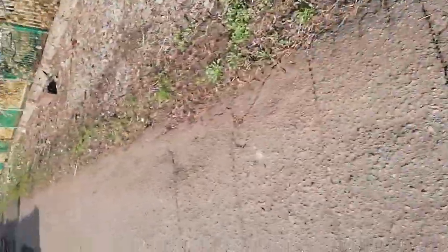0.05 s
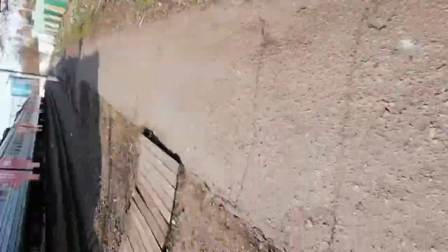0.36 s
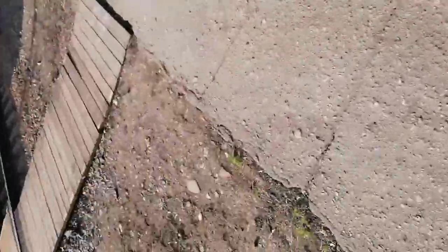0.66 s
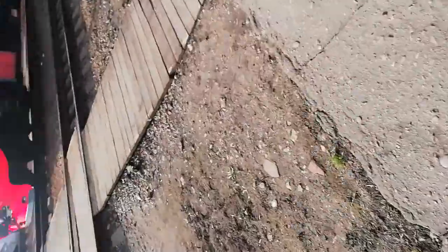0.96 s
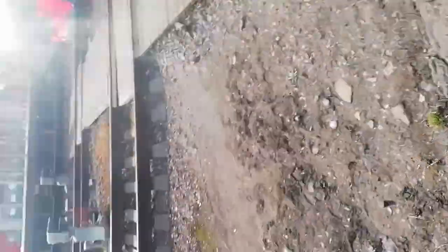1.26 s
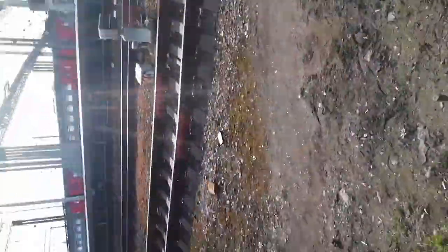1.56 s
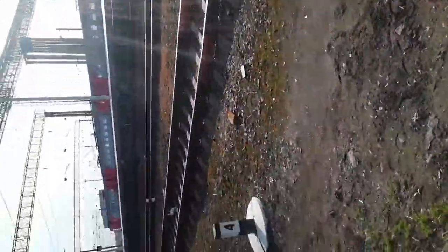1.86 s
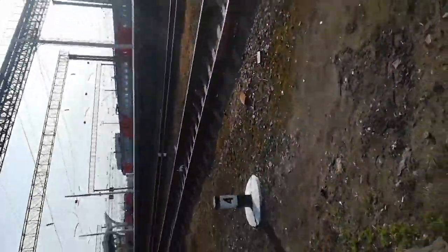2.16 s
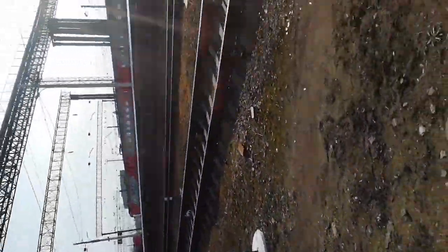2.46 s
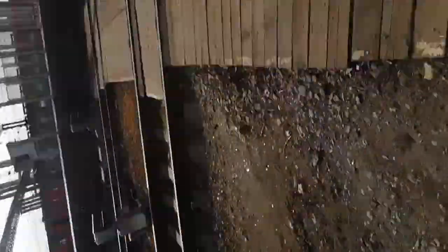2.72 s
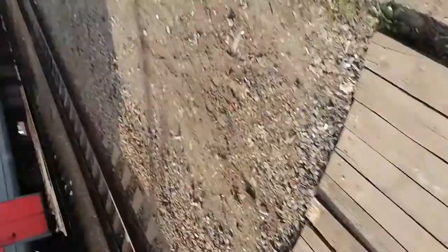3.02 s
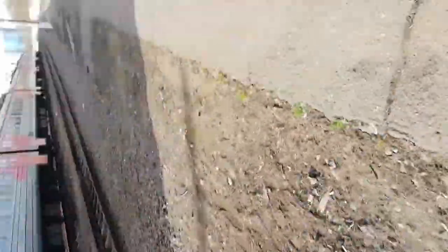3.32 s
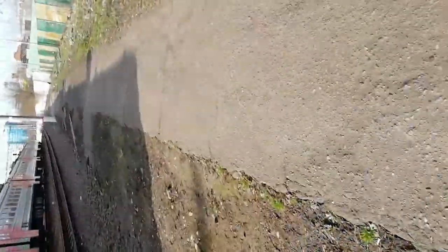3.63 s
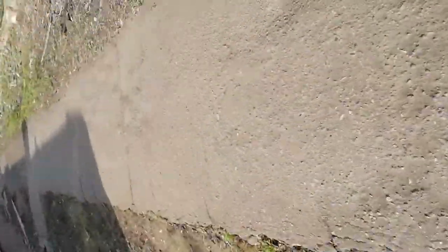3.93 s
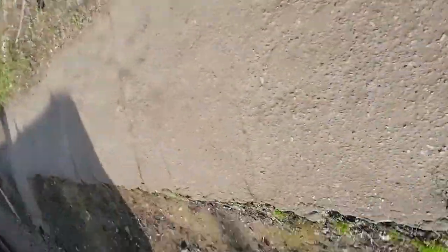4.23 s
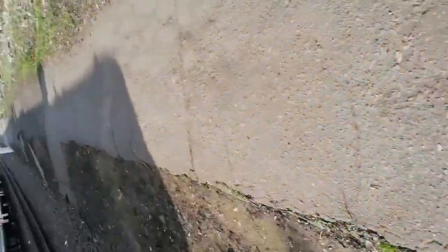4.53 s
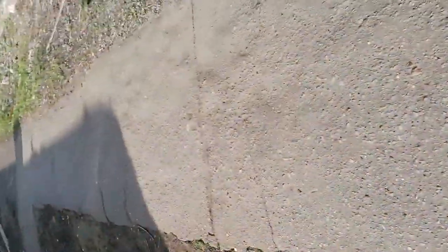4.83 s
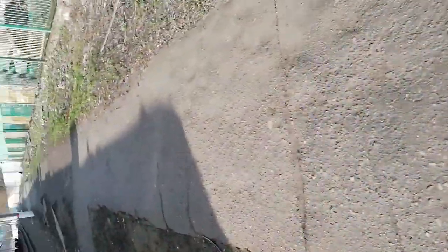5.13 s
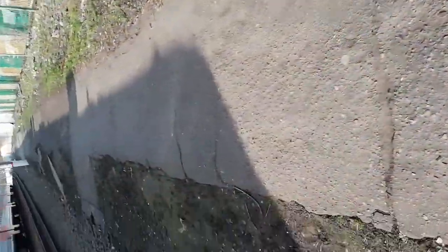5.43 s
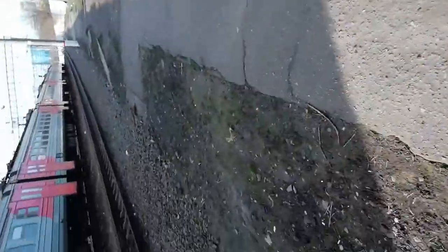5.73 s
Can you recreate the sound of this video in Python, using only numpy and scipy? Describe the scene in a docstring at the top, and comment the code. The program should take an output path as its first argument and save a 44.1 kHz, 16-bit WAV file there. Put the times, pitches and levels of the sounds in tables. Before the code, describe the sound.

A parked electric train hums and rumbles steadily under a roar and hiss of cooling air, growing slightly louder.

```python
"""An electric train stands in an open rail yard, its auxiliaries running, heard from a carried phone.
From the start a blower throbs and hums, a second motor drones and the car body rumbles, while turbulent
cooling air roars and hisses, its colour and stereo image swinging as the phone turns. From 1.5 s the
phone faces away and the treble is shaded; faint chirps follow, then sleeve-like swishes around 3 s.
As the phone draws nearer the body booms more strongly, and after 4 s one panel rings in swells."""
import sys
import numpy as np
from scipy import signal
from scipy.fft import rfft, irfft, next_fast_len
from scipy.io import wavfile

SR = 44100
rng = np.random.default_rng(int(sys.argv[2]) if len(sys.argv) > 2 else 0)


def put_to_file(sound):
    """Save the sound as 16-bit audio at rate SR, in the file named by the first command-line argument."""
    columns = np.atleast_2d(sound).T  # one column per channel
    safe = np.clip(columns, -1, 1)
    whole_steps = np.round(safe * 32767)
    wavfile.write(sys.argv[1], SR, whole_steps.astype(np.int16))


N = 263718
FRAME, HOP = 1024, 256
TIME = np.arange(N) / SR
FRAME_S = np.arange(N // HOP + 2) * HOP / SR
BIN_HZ = np.maximum(np.arange(FRAME // 2 + 1) * SR / FRAME, 1)[:, None]

# The walk towards the train: time_s, nearness (0 to 1)
NEARNESS = [(0, 0.04), (2.55, 0.44), (3.1, 0.61), (5.98, 1)]
# Direction of the train from the phone: time_s, side (0 ahead, 1 side-on)
BEARING = [(0, 0.34), (.65, 0.76), (1.2, 0.69), (1.6, 0.36), (2.45, 0.095), (2.9, 0.91), (3.3, 0.55),
           (4, 0.093), (4.6, 0.08), (5.4, 0), (5.98, 0.42)]
# Shading of the left, then the right microphone port: start_s, end_s, fade_in_s, fade_out_s
FACING_AWAY = [(1.5, 2.75, 0.16, 0.17), (1.51, 2.95, 0.14, 0.072)]
# Surges of the air noise as the phone swings: time_s, half_length_s, gain_db
SURGES = [(.68, 0.21, -3.5), (3.0, 0.062, 2), (3.28, 0.14, 4), (5.15, .18, 1.5), (5.7, 0.24, 1)]

# Diffuse wash of the yard, left port then right: far_db, near_gain_db, side_gain_db, away_gain_db,
# surge_share. The other air sounds' LEVELS have the same columns and precede the port response.
WASH_LEVELS = [(-55, 10.5, 2.5, 1.5, -0.1), (-49.5, 7.5, -1.5, 3.5, -0.4)]
# Spectrum of the wash: frequency_hz, gain_db
WASH_SPECTRUM = [(60, -53), (180, -8), (330, -1), (430, -1.5), (540, -6), (740, 1.5), (1400, -4),
                 (2500, -12.5), (4000, -13.5), (8000, -27.5)]
# Far chirps, as of a small bird: time_s, half_length_s, pitch_hz, glide_octaves_per_s, left_db, right_db
CHIRPS = [(2.27, .03, 4640, -4, -66, -53), (2.309, 0.01, 3880, 2, -62, -51),
          (2.722, 0.039, 4760, -4, -56, -51), (2.822, 0.017, 4750, -1.5, -54, -60)]
# Swishes, as of a sleeve: time_s, rise_s, fall_s, left_db, right_db
SWISHES = [(2.86, .1, 0.078, -61, -58), (2.927, 0.026, 0.043, -43, -40), (2.985, 0.014, 0.06, -47, -44),
           (3.29, 0.19, 0.039, -54, -44), (3.98, .01, .03, -59, -57)]
# Spectrum of the swishes: frequency_hz, gain_db
SWISH_SPECTRUM = [(200, -2), (450, 9), (1500, 1), (3300, 5), (5500, 8.5), (7700, -5), (10000, 0.5),
                  (14500, 2), (15800, -10)]

# Spectrum of the car body's rumble: frequency_hz, gain_db
RUMBLE_SPECTRUM = [(15, -23), (30, -42), (43, 5.5), (80, 5), (135, 4), (170, -2), (220, -2.5), (280, -4),
                   (340, -14), (450, -20.5), (650, -86), (1200, -75)]
# Resonances of the car body: centre_hz, width_hz, gain_db
BODY_MODES = [(162.5, 32, 0), (182.3, 16, -2), (200.4, 20, -1), (226.7, 38, -4.5), (273.7, 22, -9)]
# Boom of those resonances: time_s, level_db
BOOM_ENVELOPE = [(0, -49.5), (.85, -42), (1.9, -47.5), (2.5, -47.5), (2.75, -41), (3.55, -41.5),
                 (3.7, -35.5), (3.88, -39), (4.05, -38.5), (4.38, -42.5), (4.72, -38.5), (5.2, -41.5),
                 (5.6, -40), (5.98, -37)]
# Ringing of one panel: time_s, level_db
PANEL_ENVELOPE = [(0, -57.5), (2.7, -53), (4.1, -54), (4.28, -42), (4.4, -51), (4.6, -36), (4.82, -44),
                  (5.0, -42), (5.12, -35.5), (5.26, -49), (5.55, -37.5), (5.7, -47.5), (5.87, -30.5),
                  (5.98, -43)]
# Drone of the second motor: time_s, level_db
MOTOR_ENVELOPE = [(0, -43), (.4, -60), (1.1, -42.5), (2.7, -44), (3.8, -45.5), (4.3, -51.5), (5.98, -46)]
# Blade tone of the blower: time_s, level_db
BLADE_ENVELOPE = [(0, -55), (.9, -48), (1.8, -57), (2.28, -45), (2.52, -62), (2.88, -46.5), (3.2, -55),
                  (3.4, -45.5), (4.5, -43.5), (5.15, -43), (5.48, -36.5), (5.68, -46.5), (5.98, -36.5)]
# Weak harmonics of the blower shaft: shaft_multiple, level_re_blade_tone_db
SHAFT_HARMONICS = [(4, -13), (5, -10), (9, -17), (11, -14.5), (12, -22.5), (21, -22), (23, -21.5),
                   (25, -21), (28, -16)]

# Spacing of the dips that a close reflection makes at the left port: time_s, spacing_hz
COMB_SPACING = [(0, 1690), (.33, 1530), (.45, 1570), (.85, 1270), (1.0, 1470), (1.3, 1530), (1.5, 1660),
                (1.62, 1560), (1.85, 1720), (2.45, 1760), (2.7, 1510), (2.92, 1250), (3.07, 1430),
                (3.27, 1620), (3.9, 1680), (4.2, 1800), (5.4, 1780), (5.98, 1590)]
# A dip at the right port that slides as the phone tilts: time_s, centre_hz
SLIDING_DIP = [(0, 1030), (.36, 830), (.62, 1420), (.85, 1370), (1.25, 1170), (1.47, 1040), (1.6, 690),
               (2.58, 550), (2.78, 1220), (3.05, 866), (3.55, 843), (3.95, 1110), (4.65, 1010),
               (5.15, 1115), (5.65, 1004), (5.98, 1190)]
# Gliding crests and troughs: time_s, half_length_s, centre_hz, glide_octaves_per_s, left_db, right_db
SWEEPS = [(0.286, .15, 3200, -1, 5, 4.5), (.25, 0.27, 3900, -0.5, -0.5, -8.5),
          (0.44, 0.058, 5400, 1.5, 3, 4), (.41, 0.083, 2630, 4, -2, -6), (.55, 0.065, 2770, 2.1, 1, 3.5),
          (.6, 0.1, 5300, -1, 4, -5), (0.726, 0.11, 3260, -0.5, -1, 7), (.8, 0.33, 4750, -4, -0.5, -1),
          (0.906, .09, 2680, -0.5, 0, 5.5), (0.928, 0.11, 3780, 1, 1, -4), (1.08, 0.044, 5200, 0, 2, -6),
          (1.35, .15, 5300, -0.5, 1, -8), (1.45, 0.22, 3780, 0.5, -4, -7),
          (1.52, 0.17, 1280, 0.16, 8.5, -4), (2.1, .3, 2800, 2.5, -2, 2), (2.975, 0.052, 3170, -2, 4, 6),
          (3.022, .1, 4560, 4, 3, -2), (3.123, 0.045, 5100, 3, 1, 6.5), (3.112, 0.047, 4270, 3, 4, -8),
          (3.25, 0.11, 3640, -0.5, 0, -5), (3.297, .08, 6940, 3.5, -5, 8.5), (3.35, .35, 2190, -0.55, 0, 6),
          (3.5, 0.31, 4150, .3, 0, -4), (4.506, 0.2, 1980, -0.62, 3, 9.5), (4.47, .14, 3200, -.6, 1, -3),
          (5.204, 0.17, 3550, 1, 3, 4.5), (5.69, .09, 3300, 1, 8, -3), (5.6, 0.46, 11500, 0.5, 1, 1),
          (5.9, .1, 5140, .5, 0, 1)]

# Hollow resonance of the air: far_db, near_gain_db, side_gain_db, away_gain_db, surge_share
HOLLOW_LEVELS = [(-62, 10, -6, 1.7, 0.3), (-56.5, -8, 13.5, 1.3, 0.89)]
# Its centre at the right port: time_s, centre_hz
HOLLOW_RIGHT_CENTRE = [(0, 3220), (.5, 3100), (.72, 3180), (1.2, 2830), (1.7, 2530), (2.6, 2400),
                       (2.95, 2950), (3.25, 2810), (3.8, 2430), (5.3, 2450), (5.98, 3230)]
# Its swells at the right port: time_s, half_length_s, gain_db
HOLLOW_SWELLS = [(0, 0.16, -19), (.3, 0.11, 6.5), (.74, 0.091, 1), (1.3, 0.23, -1), (3.22, 0.25, 9.5),
                 (4.5, 0.74, -15), (5.68, .12, -14)]

# Hiss of the vents: far_db, near_gain_db, side_gain_db, away_gain_db, surge_share
HISS_LEVELS = [(-52.5, 1.8, 7.6, -5, 0.45), (-41.5, 1.3, 1.7, -14, 0.55)]
# Spectrum underlying the hiss: frequency_hz, gain_db
HISS_SPECTRUM = [(3000, -3), (4000, 1), (4500, 1.5), (4950, 3), (5500, 1.5), (6200, 2.5), (7000, -5.5),
                 (7700, -29), (10000, -36)]
# Peak of the hiss at the right port: time_s, centre_hz
HISS_RIGHT_PEAK = [(0, 4630), (.4, 4770), (.7, 5450), (1.3, 5050), (2.2, 4900), (2.95, 4640), (3.12, 4900),
                   (3.25, 4800), (3.65, 4970), (4.3, 4540), (5.1, 4720), (5.6, 4370), (5.83, 4900),
                   (5.98, 4950)]
# Rise and fall of the hiss at the right port: time_s, gain_db
HISS_RIGHT_GAIN = [(0, -.5), (.43, -0.5), (.6, -3.5), (1.1, -8), (1.45, -0.5), (1.9, 3), (2.5, 2.5),
                   (2.8, 0), (3.0, 0), (3.3, -1), (3.7, -1), (4.6, -0.1), (5.98, -2.5)]
# Thin whistles in the vents: pitch_hz, width_hz, level_re_peak_db
WHISTLES = [(4500, 90, 3), (4850, 150, -5.5)]
# Fine sizzle above the hiss: far_db, near_gain_db, side_gain_db, away_gain_db, surge_share
SIZZLE_LEVELS = [(-55, 4.2, 3.7, -7, 1), (-58, 5.2, 0.22, -13, 1.0)]
# Spectrum of the sizzle: frequency_hz, gain_db
SIZZLE_SPECTRUM = [(5000, 1), (7600, -1), (8600, 1.5), (9300, 1.5), (9900, 6), (10700, 2), (11500, 4.5),
                   (13500, 1), (15000, 4), (15800, -10)]

# Air rushing through the grilles: far_db, near_gain_db, side_gain_db, away_gain_db, surge_share
RUSH_LEVELS = [(-46, 0.38, 2.8, -5, 0.21), (-37, -1.8, 0.78, -7.5, 0.086)]
# Spectrum underlying the rush: frequency_hz, gain_db
RUSH_SPECTRUM = [(700, -16), (1250, 11), (1500, 7.5), (2200, 4.5), (3100, 2), (3800, -2.5), (5000, -46),
                 (8000, -22)]
# Its crests at the right port, in multiples of the sliding dip: centre_ratio, width_ratio, gain_db
RUSH_CRESTS = [(1.73, 0.75, 1), (3.3, 0.75, -2.5)]
# Its swells at the right port: time_s, half_length_s, gain_db
RUSH_SWELLS = [(.51, 0.078, 3.5), (.83, 0.2, 1.5), (4.48, 0.2, -2.5), (5.68, 0.25, 2)]

# Roar of the fan: far_db, near_gain_db, side_gain_db, away_gain_db, surge_share
ROAR_LEVELS = [(-39.5, 3.7, 0.9, -1.9, 0.017), (-37, 2.5, -1.8, -0.027, 0.98)]
# Its swells at the right port: time_s, half_length_s, gain_db
ROAR_SWELLS = [(.15, 0.25, -7), (.76, 0.089, 7.5), (1.2, 0.18, -4), (1.76, 0.16, 4), (2.6, 0.061, 1.5),
               (3.15, 0.12, 5.5), (3.55, 0.12, 4)]


def from_db(db):
    """Amplitude grows tenfold for every 20 dB."""
    return 10 ** (np.asarray(db) / 20)


def curve(rows, at=TIME):
    """Linear interpolation of a (time_s, value) table."""
    return np.interp(at, *np.transpose(rows))


def bell(at, centre_s, half_length_s):
    """A Gaussian envelope, 1 at its centre."""
    return np.exp(-((at - centre_s) / half_length_s) ** 2)


def swells(rows):
    """Gaussian rises and falls add in dB, frame by frame."""
    return sum(db * bell(FRAME_S, s, length) for s, length, db in rows)


def spectrum(points, hz):
    """Spectral envelope: gain interpolated on log axes, falling 12 dB an octave past the last point."""
    knots, db = np.transpose(points)
    return from_db(np.interp(np.log(hz), np.log(knots), db)) * np.minimum(1, knots[-1] / hz) ** 2


def resonance(centre_hz, width_hz, hz=BIN_HZ):
    """Gain of a second-order resonance applied twice, 1 at its centre."""
    return 1 / (1 + ((hz ** 2 - centre_hz ** 2) / (hz * width_hz)) ** 2)


def noise(shape):
    """Spectral shaping of white noise by the gain shape(hz), scaled to rms 1."""
    size = next_fast_len(N, real=True)
    hz = np.maximum(np.arange(size // 2 + 1) * SR / size, 1e-3)
    shaped = irfft(rfft(rng.standard_normal(size)) * shape(hz), size)[:N]
    return shaped / np.sqrt(np.mean(shaped ** 2) + 1e-20)


def drift(rate_hz):
    """Random modulation: low-pass noise of rms 1."""
    return noise(lambda hz: 1 / (1 + (hz / rate_hz) ** 2) ** 2)


def tone(hz, wander_rad, flutter_db):
    """Multipath fading: changing echo paths shake the phase and level of a sinusoid of rms about 1."""
    phase = 2 * np.pi * (hz * TIME + rng.random()) + wander_rad * drift(3.2)
    return np.sqrt(2) * np.sin(phase) * from_db(flutter_db * drift(24))


def port_levels(rows):
    """Distance, bearing and acoustic shadow set an air sound's left and right level in dB."""
    near, side = curve(NEARNESS, FRAME_S), curve(BEARING, FRAME_S)
    return [db + near_db * near + side_db * side + away_db * shade + share * swells(SURGES)
            for (db, near_db, side_db, away_db, share), shade in zip(rows, shadows())]


def shadows():
    """Acoustic shadow on each port (0 to 1) while the phone faces away."""
    return [0.5 * (np.tanh((FRAME_S - start) / fade_in) - np.tanh((FRAME_S - end) / fade_out))
            for start, end, fade_in, fade_out in FACING_AWAY]


def airflow(shapes, levels, response, coherence, gust_db, right_gain_db=0):
    """Partial coherence: each port hears turbulent noise shared with the other, and noise of its own."""
    white = rng.standard_normal((3, (len(FRAME_S) - 1) * HOP))
    shared, *separate = signal.stft(white, nperseg=FRAME, noverlap=FRAME - HOP)[2]
    left_db, right_db = port_levels(levels)
    ports = []
    for shape, db, port, own in zip(shapes, (left_db, right_db + right_gain_db), response, separate):
        gain = from_db(db) * shape / np.sqrt(np.mean(shape ** 2, axis=0))
        ports.append(gain * port * (np.sqrt(coherence) * shared + np.sqrt(1 - coherence) * own))
    sound = signal.istft(np.array(ports), nperseg=FRAME, noverlap=FRAME - HOP)[1][:, :N]
    return sound * from_db(gust_db * drift(17))


def left_response(side, shade):
    """Comb filtering by a close reflection, with dips that open when facing away or side-on."""
    ratio = BIN_HZ / curve(COMB_SPACING, FRAME_S)
    depth = (0.16 + 0.14 * side) * np.clip((ratio - 0.7) / 0.63, 0, 1) / (1 + (BIN_HZ / 8500) ** 4)
    comb = 1 - depth * np.cos(2 * np.pi * ratio)
    shade_dip = 1 - 0.42 * shade * resonance(5200, 1300)
    side_dip = 1 - 0.35 * side * resonance(5400, 1100)
    return comb * shade_dip * side_dip


def right_response(side, shade):
    """Directional filtering: a sliding dip repeats as a treble ripple; phase lag grows with bearing."""
    dip_hz = curve(SLIDING_DIP, FRAME_S)
    ratio = BIN_HZ / dip_hz
    sliding_dip = 1 - np.clip(0.78 + 0.3 * side, 0, 1) * resonance(dip_hz, 0.32 * dip_hz)
    ripple_depth = 0.16 * np.clip(ratio - 2, 0, 1) / (1 + (BIN_HZ / 4100) ** 2)
    ripple = 1 + ripple_depth * np.cos(2 * np.pi * (ratio - 1.8) / 1.82)
    steady_dip = 1 - 0.33 * resonance(3600, 550)
    mid_top_hz = 0.95 * dip_hz + 950 * shade
    mid_band = np.clip((BIN_HZ - 380) / 270, 0, 1) / (1 + (BIN_HZ / mid_top_hz) ** 8)
    treble_lag_s = 0.00011 + 0.00031 * side
    lag_rad = (1 + 2.29 * side) * mid_band + 2 * np.pi * treble_lag_s * np.maximum(BIN_HZ - 880, 0)
    return sliding_dip * ripple * steady_dip * np.exp(-1j * lag_rad)


def port_response():
    """Directivity of both ports: crests and troughs glide as the phone turns, beside a steady notch."""
    side = curve(BEARING, FRAME_S)
    shade, _ = shadows()
    sweep_db = 0
    for s, length, hz, glide, *ports_db in SWEEPS:
        centre_hz = hz * 2 ** (glide * np.clip(FRAME_S - s, -2 * length, 2 * length))
        crest = bell(FRAME_S, s, length) * resonance(centre_hz, 0.21 * centre_hz)
        sweep_db = sweep_db + np.multiply.outer(ports_db, crest)
    notch = 1 - 0.42 * resonance(7770, 460)
    return np.array([left_response(side, shade), right_response(side, shade)]) * notch * from_db(sweep_db)


def delayed(x, seconds):
    """Propagation delay along a path of changing length."""
    return np.interp(TIME - seconds, TIME, x)


def ground_echo(sound, delay_s=0.0102, gain_db=-15):
    """Reflection off the ground; its path varies as the hand rises and sinks."""
    path_s = delay_s * (1 + 0.0031 * drift(0.68))
    return from_db(gain_db) * np.array([delayed(port, path_s) for port in sound])


def yard_wash():
    """A diffuse field: machine noise scattered from all around is nearly incoherent between the ports."""
    shape = spectrum(WASH_SPECTRUM, BIN_HZ)
    return airflow((shape, shape), WASH_LEVELS, response=(1, 1), coherence=0.088, gust_db=2.24)


def far_chirps(blur_hz=110):
    """Spectral broadening: random modulation blurs short gliding notes, as distance does."""
    notes = 0
    for s, length, hz, glide, left_db, right_db in CHIRPS:
        pitch_hz = hz * 2 ** (glide * np.clip(TIME - s, -2 * length, 2 * length))
        note = bell(TIME, s, length) * np.exp(2j * np.pi * np.cumsum(pitch_hz) / SR)
        notes = notes + from_db([[left_db], [right_db]]) * note
    return notes.real * drift(blur_hz) + notes.imag * drift(blur_hz)


def swishes(grain_db=1.8):
    """Friction noise: short broadband rubs, independent at each port under one grainy envelope."""
    envelope = sum(from_db([[left_db], [right_db]]) * bell(TIME, s, np.where(TIME < s, rise, fall))
                   for s, rise, fall, left_db, right_db in SWISHES)
    rubs = np.array([noise(lambda hz: spectrum(SWISH_SPECTRUM, hz)) for _ in range(2)])
    return envelope * rubs * from_db(grain_db * drift(600))


def second_motor(pitch_hz=143.1):
    """Periodic vibration of a motor radiates a single droning tone."""
    return from_db(curve(MOTOR_ENVELOPE)) * tone(pitch_hz, wander_rad=0.36, flutter_db=2.5)


def car_body(rumble_db=-40.5, panel_hz=169.5):
    """Forced vibration: the car rumbles and booms in its modes, and one panel rings to a tone."""
    rumble = from_db(rumble_db) * noise(lambda hz: spectrum(RUMBLE_SPECTRUM, hz))
    boom = noise(lambda hz: sum(from_db(db) * resonance(mode, width, hz) for mode, width, db in BODY_MODES))
    panel = tone(panel_hz, wander_rad=0.9, flutter_db=1.5)
    return rumble + from_db(curve(BOOM_ENVELOPE)) * boom + from_db(curve(PANEL_ENVELOPE)) * panel


def blower(shaft_hz=25.12, blades=8, throb_db=-48.5):
    """Rotor harmonics: unbalance throbs once a turn, and the blades hum at their passing frequency."""
    throb = from_db(throb_db) * tone(shaft_hz, wander_rad=0.27, flutter_db=3.5)
    blade_tone = tone(blades * shaft_hz, wander_rad=0.41, flutter_db=-2)
    harmonics = sum(from_db(db) * tone(multiple * shaft_hz, wander_rad=0.69, flutter_db=4)
                    for multiple, db in SHAFT_HARMONICS)
    return throb + from_db(curve(BLADE_ENVELOPE)) * (blade_tone + harmonics)


def hollow_air(response, left_hz=2480):
    """A broad resonance gives the air noise a hollow colour that comes and goes."""
    shapes = [resonance(hz, width_hz=1300) for hz in (left_hz, curve(HOLLOW_RIGHT_CENTRE, FRAME_S))]
    return airflow(shapes, HOLLOW_LEVELS, response, coherence=0.92, gust_db=1.5,
                   right_gain_db=swells(HOLLOW_SWELLS))


def vent_hiss(response, left_peak_hz=4840, eddy_db=0.9):
    """Fine turbulence at the vents hisses, whistles and sizzles; small eddies roughen its level."""
    whistles = sum(from_db(db) * resonance(hz, width) for hz, width, db in WHISTLES)
    peaks = [resonance(hz, width_hz=780) for hz in (left_peak_hz, curve(HISS_RIGHT_PEAK, FRAME_S))]
    shapes = [spectrum(HISS_SPECTRUM, BIN_HZ) * (peak + whistles + from_db(-6.5)) for peak in peaks]
    hiss = airflow(shapes, HISS_LEVELS, response, coherence=0.5, gust_db=0.7,
                   right_gain_db=curve(HISS_RIGHT_GAIN, FRAME_S))
    spray = spectrum(SIZZLE_SPECTRUM, BIN_HZ)
    sizzle = airflow((spray, spray), SIZZLE_LEVELS, response, coherence=0.25, gust_db=0.75)
    return hiss * from_db(eddy_db * drift(100)) + sizzle * from_db(eddy_db * drift(150))


def grille_rush(response):
    """Turbulent flow through the grilles makes broadband noise, its crests moving as the phone turns."""
    side, dip_hz = curve(BEARING, FRAME_S), curve(SLIDING_DIP, FRAME_S)
    shape = spectrum(RUSH_SPECTRUM, BIN_HZ)
    left = shape * (resonance(3900 - 2100 * side, width_hz=1100) + from_db(3))
    crests = sum(from_db(db) * resonance(ratio * dip_hz, width * dip_hz)
                 for ratio, width, db in RUSH_CRESTS)
    right = shape * (crests + from_db(-8))
    return airflow((left, right), RUSH_LEVELS, response, coherence=0.91, gust_db=0.84,
                   right_gain_db=swells(RUSH_SWELLS))


def fan_roar(response):
    """Fan turbulence excites one broad resonance with a slight, narrow ring inside it."""
    ring = 1 + from_db(-6) * resonance(1090, width_hz=60)
    left_hz = 976 * (1 - 0.023 * (curve(BEARING, FRAME_S) - 0.5))   # sinks a little side-on
    shapes = ring * resonance(left_hz, width_hz=400), ring * resonance(1022, width_hz=350)
    return airflow(shapes, ROAR_LEVELS, response, coherence=0.96, gust_db=0.4,
                   right_gain_db=swells(ROAR_SWELLS))


def scene():
    """Superposition: long waves reach both ports nearly alike, while the air noise is wide."""
    hum = blower() + second_motor() + car_body()
    left_lag_s = 0.00025 - 0.00019 * curve(BEARING)
    hum = np.array([delayed(hum, left_lag_s), hum])
    response = port_response()
    air = fan_roar(response) + grille_rush(response) + hollow_air(response) + vent_hiss(response)
    return ground_echo(air) + yard_wash() + swishes() + far_chirps() + hum + air


def record(dry, cutoff_hz=15900):
    """Band limiting: a steep elliptic low-pass removes the top of the treble."""
    return signal.sosfilt(signal.ellip(12, 0.1, 90, cutoff_hz, fs=SR, output="sos"), dry)


dry = scene()
out = record(dry)
put_to_file(out)
```